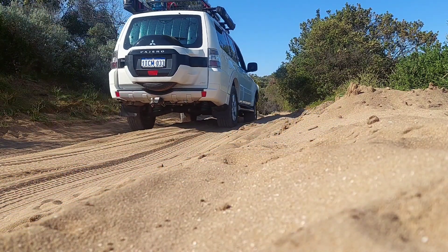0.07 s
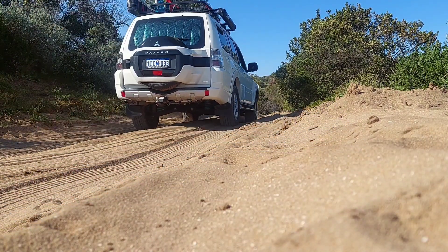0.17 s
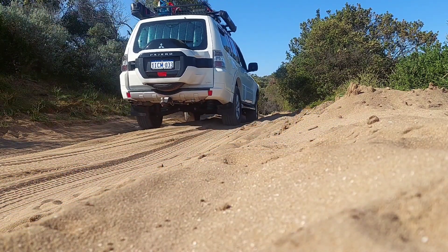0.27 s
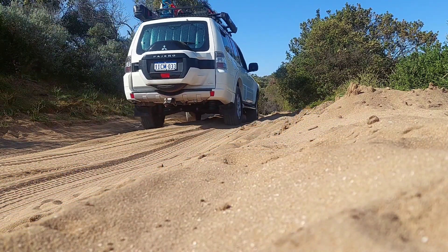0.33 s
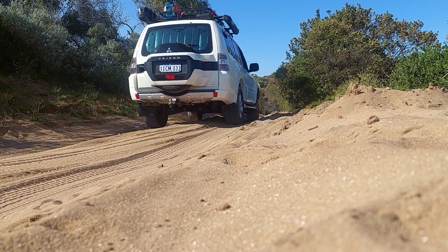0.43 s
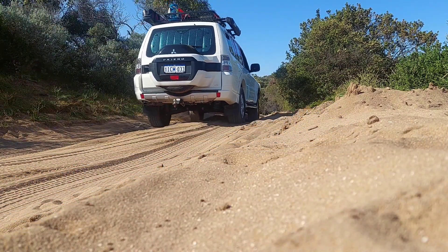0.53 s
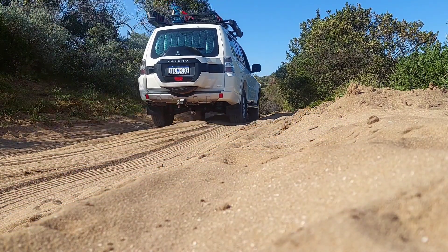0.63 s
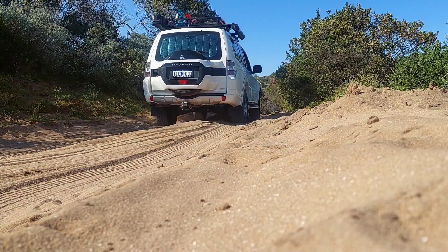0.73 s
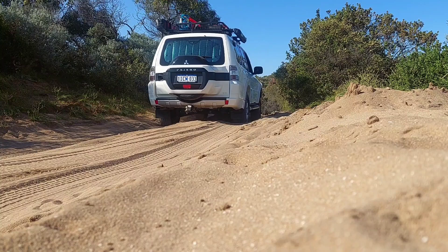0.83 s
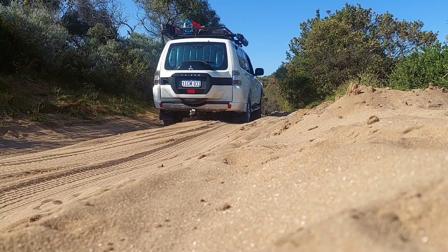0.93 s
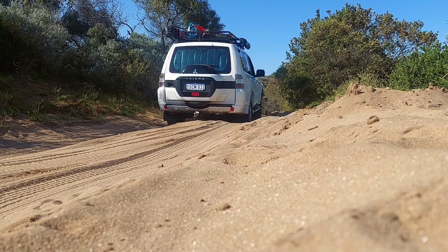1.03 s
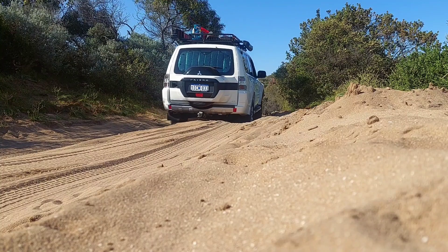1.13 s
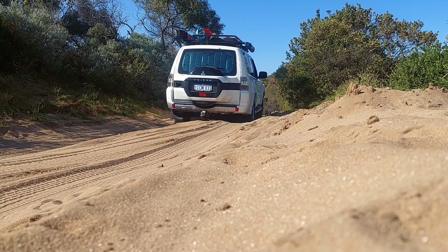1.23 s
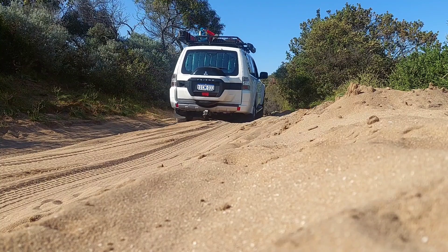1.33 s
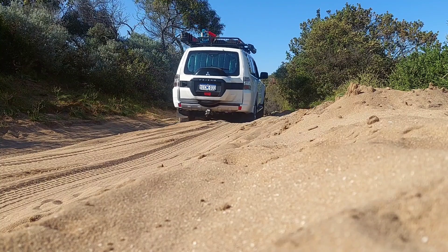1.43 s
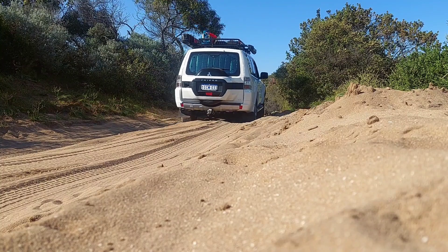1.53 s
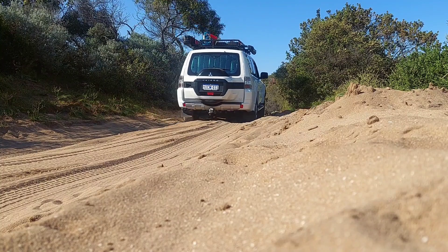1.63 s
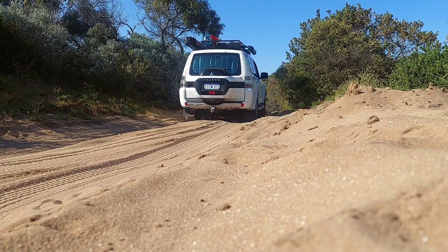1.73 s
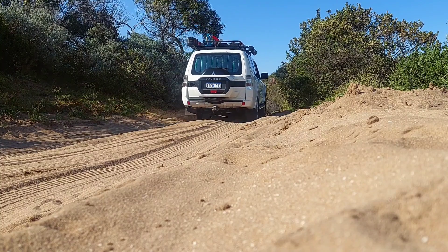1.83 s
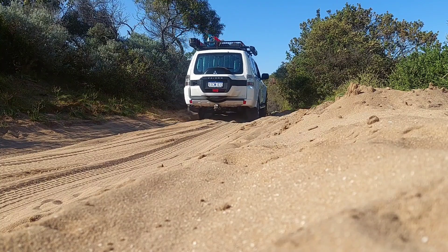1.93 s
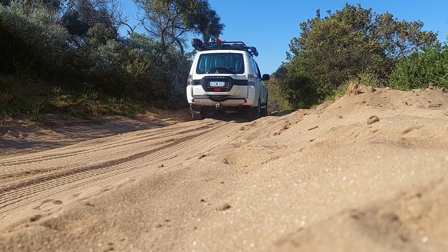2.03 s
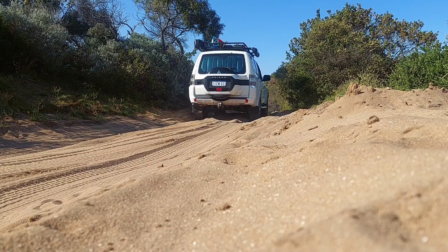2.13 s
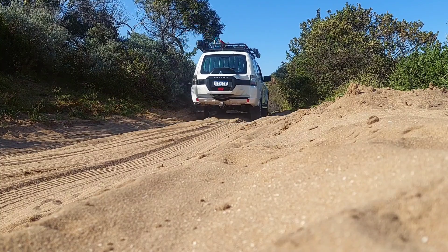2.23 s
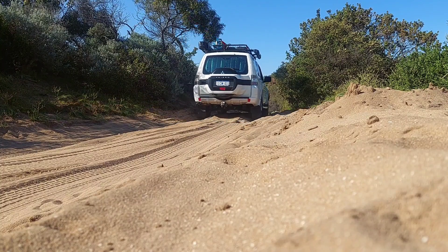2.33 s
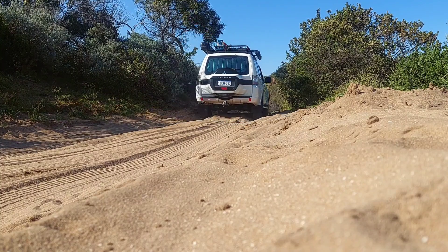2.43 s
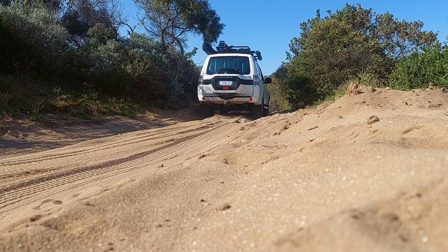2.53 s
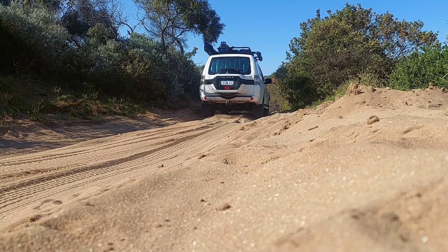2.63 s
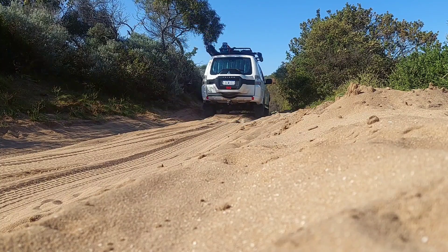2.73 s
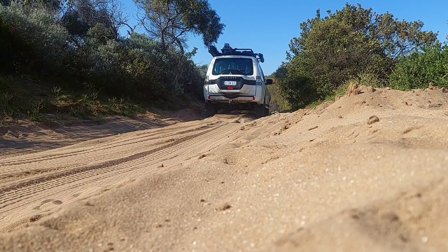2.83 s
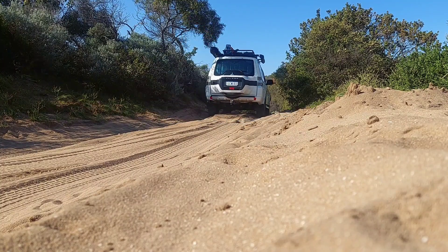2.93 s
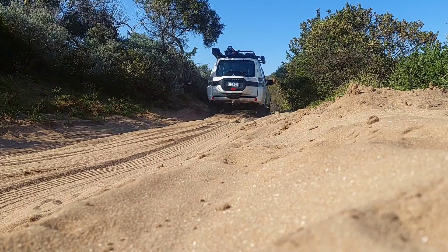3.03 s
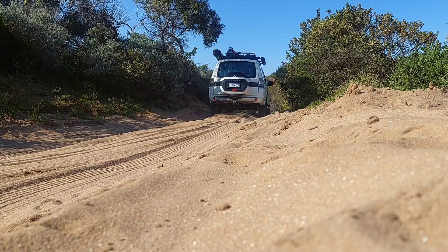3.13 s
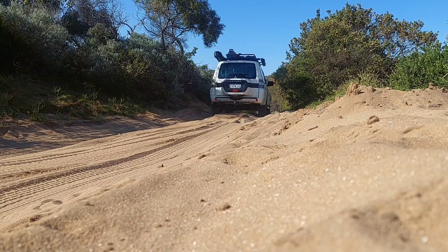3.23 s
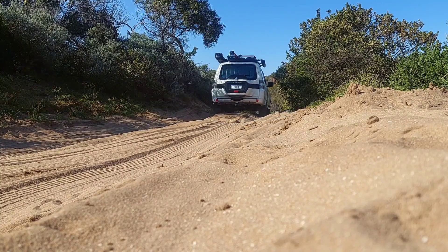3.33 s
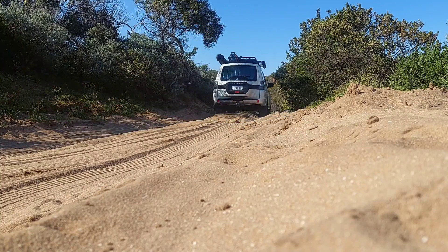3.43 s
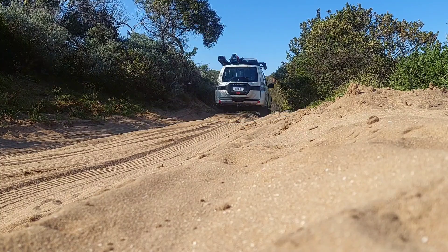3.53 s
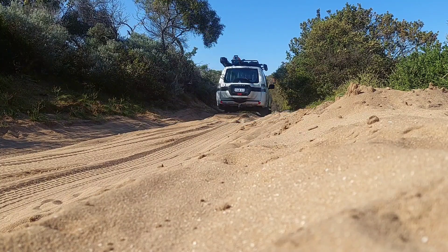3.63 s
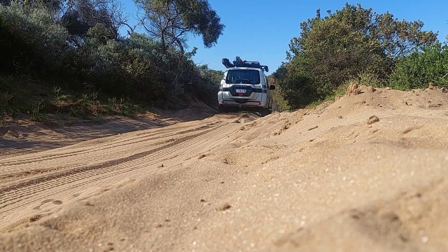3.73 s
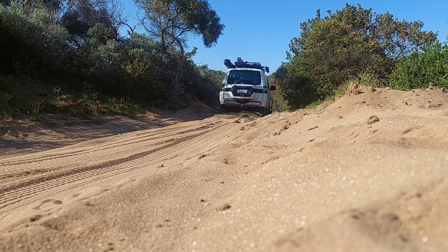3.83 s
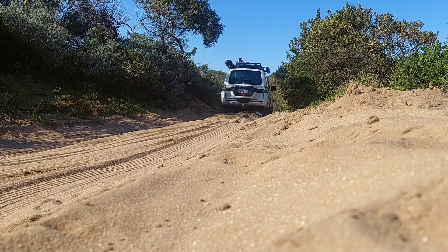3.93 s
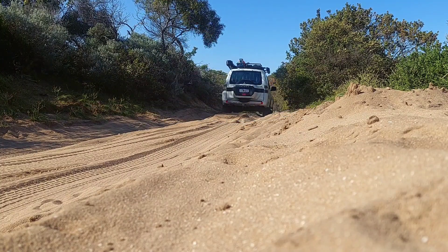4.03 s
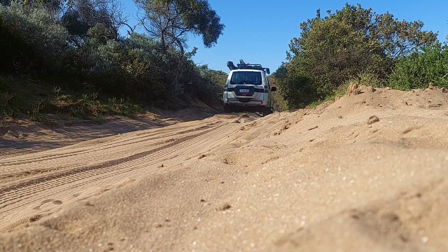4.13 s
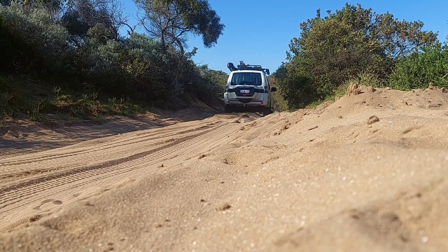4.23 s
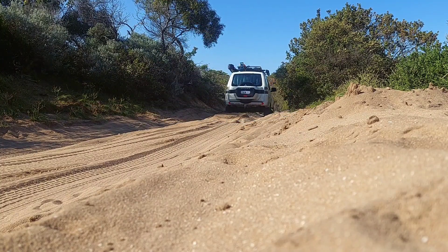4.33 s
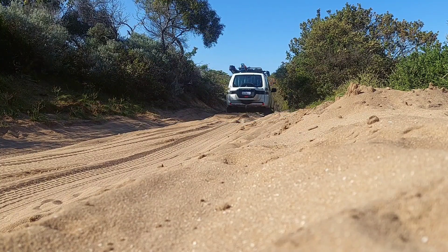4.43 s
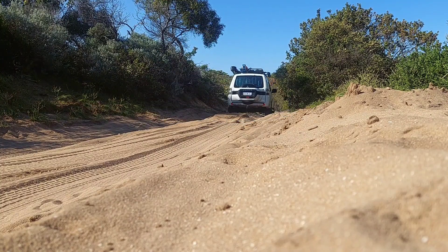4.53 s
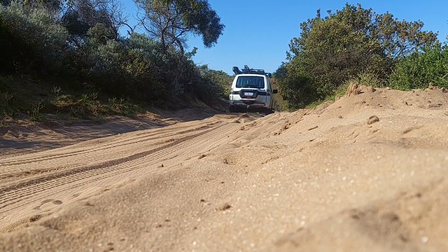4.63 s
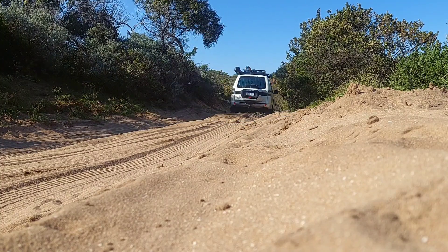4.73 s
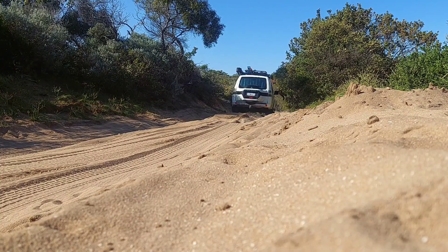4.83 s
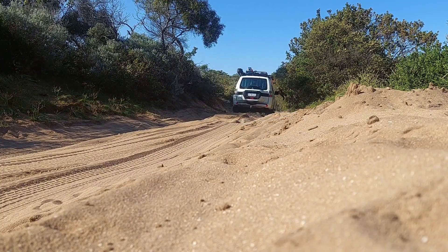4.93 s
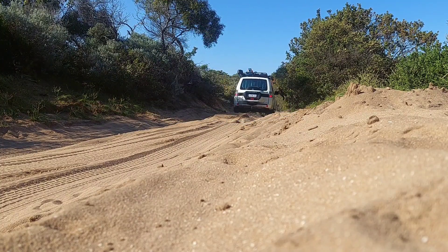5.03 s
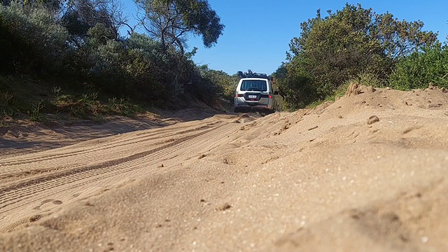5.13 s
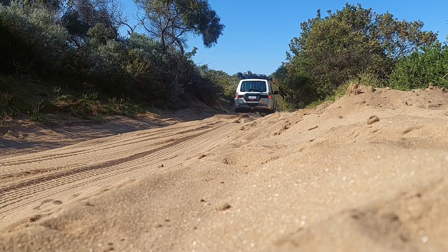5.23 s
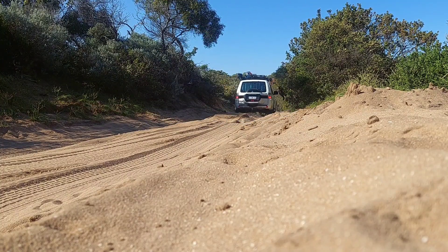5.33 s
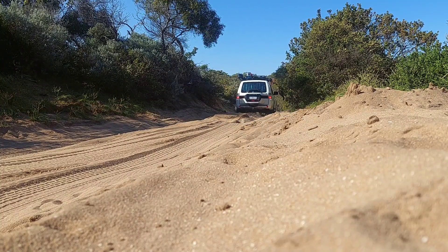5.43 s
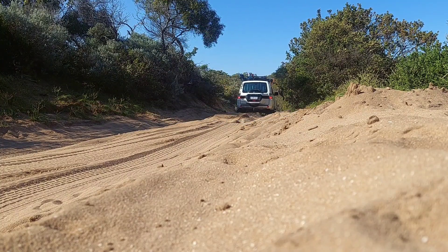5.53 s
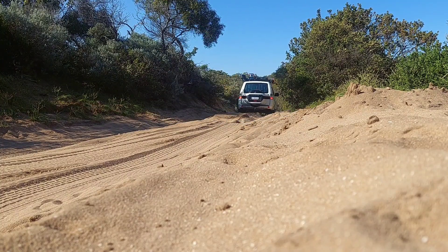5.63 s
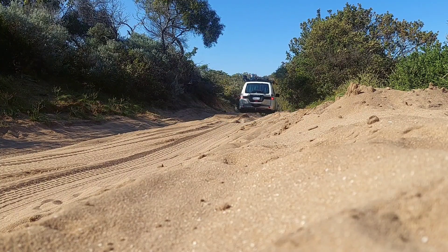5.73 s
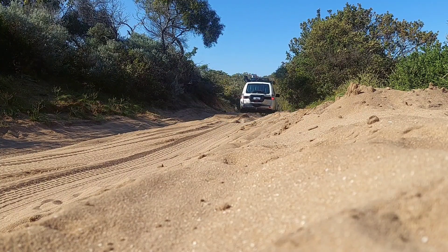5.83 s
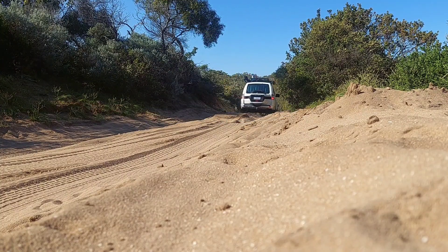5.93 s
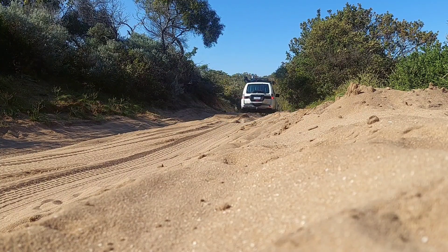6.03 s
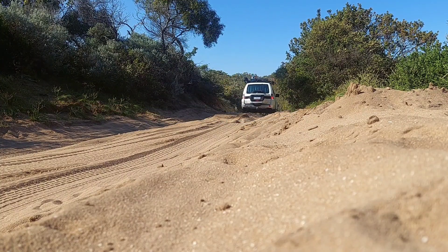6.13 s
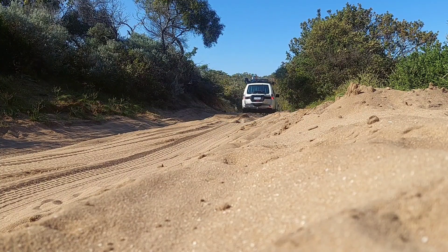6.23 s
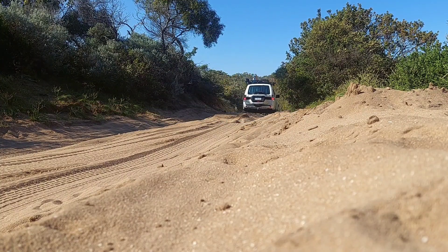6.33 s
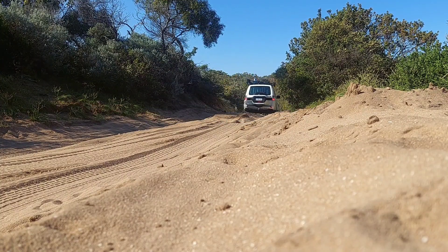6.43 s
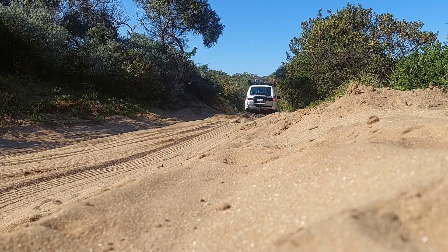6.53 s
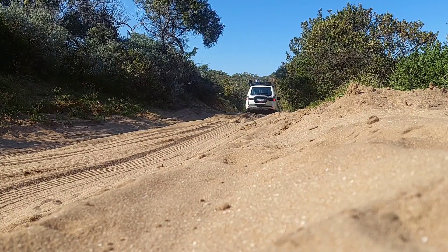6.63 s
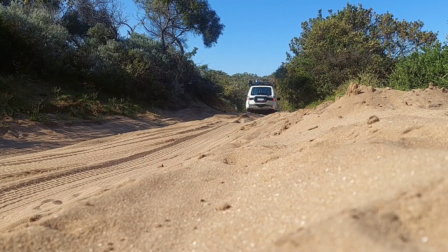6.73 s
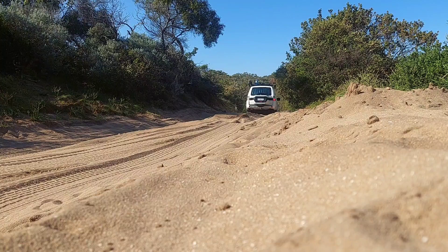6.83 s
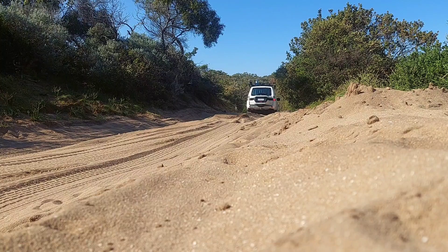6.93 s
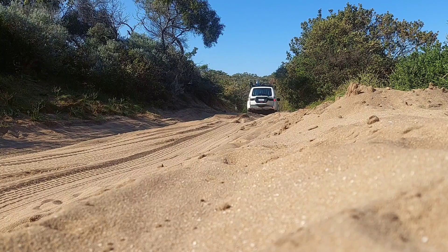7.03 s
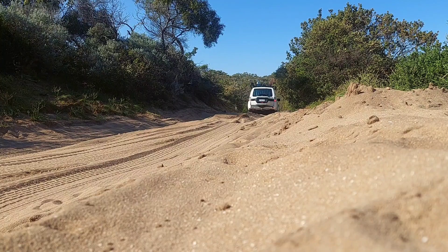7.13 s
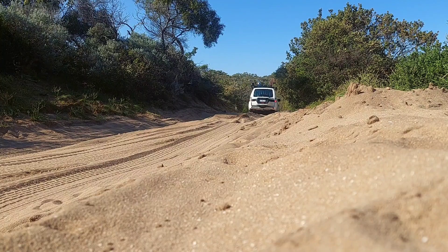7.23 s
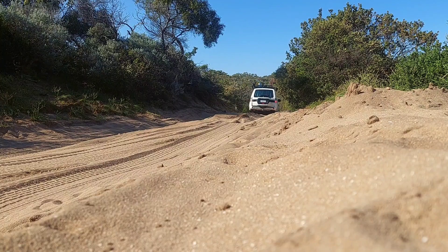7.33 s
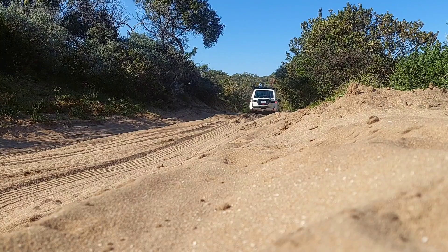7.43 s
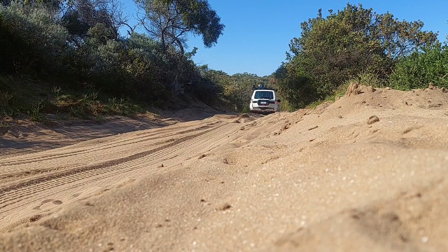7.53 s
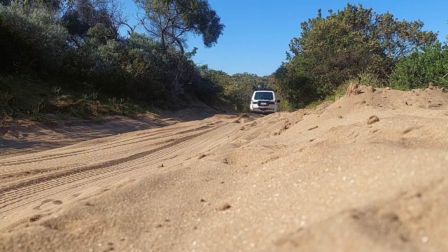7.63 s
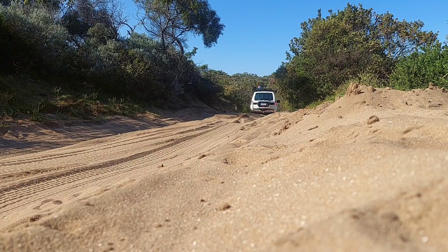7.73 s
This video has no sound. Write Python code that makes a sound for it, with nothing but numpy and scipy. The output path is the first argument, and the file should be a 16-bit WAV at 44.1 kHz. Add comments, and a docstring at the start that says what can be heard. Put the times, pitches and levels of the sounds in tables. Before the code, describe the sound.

A low exhaust note starts gently, pushes hard within the first second and drones away with soft sand hiss and a few dull tyre scuffs. After nearly four seconds the throttle drops and pitch sags, leaving distant, pulsing rumble. Sharp two-part bird notes come forward on the right, then thin ticks and whistles, and finally a faint, even run of chirps on the left. Low wind puffs bump the fixed outdoor stereo microphone.

```python
"""Sandy track through scrub, a stereo microphone 5 m behind a four-wheel drive as it pulls away.
It climbs under throttle, lifts off near 3.8 s and rumbles on behind a rise: the exhaust is clear crank
orders over a drone coloured by the pipe, the gas and tyres are shaped noise. Small birds, arcs of whistle
with scattered echoes, chirp on both sides; a few puffs of breeze thump the right microphone in slow, rough cycles."""
import sys
import numpy as np
from scipy import signal
from scipy.fft import rfft, irfft, next_fast_len
from scipy.io import wavfile

SR = 44100
rng = np.random.default_rng(int(sys.argv[2]) if len(sys.argv) > 2 else 0)


def log_audio(samples):
    """Write samples as a 16-bit WAV file to the path given in sys.argv[1]."""
    # one column per channel
    frames = np.atleast_2d(samples).T
    # limit to full scale, then quantise
    limited = np.clip(frames, -1, 1)
    pcm = np.round(limited * 32767).astype(np.int16)
    wavfile.write(sys.argv[1], SR, pcm)


N = 342657
TIME = np.arange(N) / SR


def amp(db):
    """Decibels to gain."""
    return 10 ** (np.asarray(db) / 20)


def unit(x):
    """Scales to rms 1."""
    return x / np.sqrt(np.mean(x ** 2) + 1e-20)


def curves(rows):
    """The columns of a time table, at every sample."""
    s, *columns = np.transpose(rows)
    return [np.interp(TIME, s, column) for column in columns]


def read(points, hz):
    """A spectrum table on a log-frequency axis."""
    f, value = np.transpose(points)
    return np.interp(np.log(hz + 1), np.log(f + 1), value)


def add(mix, s, sound):
    """Lays a stereo sound into the mix at time s."""
    part = mix[:, max(round(s * SR), 0):][:, :sound.shape[1]]
    part += sound[:, :part.shape[1]]


def pan(db):
    """Left and right gains for a level difference; positive is louder on the left."""
    return amp([[db / 2], [-db / 2]])


def swells(rows):
    """A sum of smooth bell-shaped bumps, one for each (s, half length s, height)."""
    return sum(height * np.exp(-.5 * ((TIME - s) / length) ** 2) for s, length, height in rows)


def noise(colour, same):
    """Stereo noise of a given colour at rms 1; same is the share of power common to both sides."""
    size, same = next_fast_len(N), np.clip(same, 0, 1)
    gain = amp(read(colour, np.fft.rfftfreq(size, 1 / SR)))
    spectra = rfft(rng.standard_normal((3, size))) * gain
    common, *own = irfft(spectra, size)[:, :N]
    return unit(np.sqrt(same) * common + np.sqrt(1 - same) * np.array(own))


def wander(hz):
    """A smooth random drift of rms 1, up to about hz."""
    f = np.fft.rfftfreq(4096, 1 / 400)  # drawn at 400 points a second
    drift = irfft(rfft(rng.standard_normal(2 * len(f) - 2)) / (1 + (f / hz) ** 4))
    return unit(np.interp(TIME, np.arange(len(drift)) / (2 * f[-1]), drift))


# colour of the faint background hiss: freq_hz, relative level_db (per Hz)
AIR_COLOUR = [(400, 1), (630, -4.5), (790, -5.5), (1000, -8), (2000, -10.5), (4000, -14.5), (6300, -19),
              (8500, -17), (9700, -13.5), (11000, -17.5), (13500, -16), (15400, -16)]


def air(level_db=-76.5):
    """A faint steady hiss, nearly independent at the two microphones."""
    return amp(level_db) * noise(AIR_COLOUR, 0.0095) * pan(-0.6)


# puffs of breeze on the microphone: start_s (centre), level_db (before the low cut), half_length_s
BREEZE_PUFFS = [(4.521, -40.5, 0.012), (4.577, -31.5, 0.0089), (4.873, -42, 0.023), (4.896, -30.5, 0.013),
                (5.008, -24.5, 0.0047), (5.044, -46.5, 0.038), (5.14, -47, .014), (5.181, -35, 0.014),
                (5.675, -45, 0.012), (5.881, -37.5, 0.0098), (5.929, -42, 0.016)]


def breeze(eddy_hz=72, unsteady=0.233, left_db=-24, churn=0.59, low_cut_hz=48):
    """Each puff shakes the right microphone port for a few slow cycles, with finer turbulence on top."""
    push = swells((s, length, amp(db)) for s, db, length in BREEZE_PUFFS)
    eddy_speed = eddy_hz * (1 + unsteady * wander(59.7))
    eddies = np.cos(2 * np.pi * np.cumsum(eddy_speed) / SR)
    colour = [(20, 3), (50, -0.5), (120, -2.5), (200, -18.0), (400, -39.5), (1000, -61), (3000, -100)]
    turbulence = noise(colour, 0)
    thumps = push * (0.92 * eddies + churn * turbulence) * amp([[left_db], [0]])
    low_cut = signal.butter(2, low_cut_hz, "highpass", fs=SR, output="sos")
    return signal.sosfilt(low_cut, thumps)


def scrub(x, t60=0.34, near_t60=0.034, near_db=6):
    """Nearby branches scatter a quick burst of echoes, the wider scrub a soft tail, different on each side."""
    t = np.arange(SR) / SR
    decay = amp(-60 * t / t60) + amp(near_db - 60 * t / near_t60)
    tail = rng.standard_normal((2, SR)) * decay
    return signal.fftconvolve(x, tail / np.linalg.norm(tail[0]), axes=1)[:, :N]


def syllable(length, pitches, swell_db, overtone_db, waver=0.011, flutter_db=5.0, taper=0.39):
    """A whistle that arcs through three pitches, never twice quite the same."""
    u = np.linspace(-1, 1, round(length * SR))
    strays = rng.standard_normal(size=(2, 8))
    bend, flutter = (np.interp(u, np.linspace(-1, 1, len(row)), row) for row in strays)
    period = np.polyval(np.polyfit([-1, 0, 1], 1 / pitches, 2), u)  # the arc is a parabola in period
    phase = 2 * np.pi * np.cumsum((1 + waver * bend) / period) / SR
    wave = np.sin(phase) + amp(overtone_db) * np.sin(2 * phase)
    level = amp(swell_db * u / 2 + flutter_db * flutter)
    return wave * level * signal.windows.tukey(len(u), taper)


# a far bird repeats its "weet" at an even pace towards the end
TRILL_S, TRILL_GAP_S, TRILL_DB, TRILL_PITCH = 7.085, 0.11, -77, 0.98


def trill(side_db=5, echo_db=1, count=9):
    """The far bird's even run as chirp rows, each straying a little in pitch."""
    return [("weet", TRILL_S + k * TRILL_GAP_S, TRILL_DB, side_db, TRILL_PITCH * (1 + 0.042 * stray), echo_db)
            for k, stray in enumerate(rng.standard_normal(count))]


# syllables of each bird note: start_s (from the note's accent), length_s, first_hz, middle_hz, last_hz
# (before the chirp's pitch factor), level_db (relative to the chirp), swell_db (from start to end)
BIRD_NOTES = { "chewit": [(-.042, .043, 4000, 2480, 4300, -8, 12), (-.002, .021, 4500, 3000, 2720, 0, 4)],
              "chew": [(-.042, .041, 3500, 2500, 3600, -3.5, 10), (-.002, .015, 3750, 3000, 2500, -3, 0)],
              "tsip": [(-.008, .008, 5400, 6200, 7300, -14, 3), (-.001, .017, 7500, 5850, 6200, -2, 2)],
              "seesik": [(-.039, .027, 6600, 5750, 5950, -7, 0), (-.011, .009, 4700, 5300, 5000, -7, 0),
              (-.001, .014, 7700, 6350, 5950, 0, 0), (.016, .014, 5250, 4500, 3700, -3, 0)],
              "tseesik": [(-.043, .031, 6050, 6680, 6200, -4, 3), (-.011, .01, 5900, 5850, 6100, -3, -4),
              (-.002, .013, 7600, 6450, 6150, 0, 0), (.013, .015, 5400, 4250, 3400, -2, -3)],
              "twik": [(-.021, .022, 2550, 3100, 4300, -6, 5), (-.001, .009, 4650, 3900, 3600, -7, 0),
              (.006, .026, 3620, 3540, 3560, -3, -4)], "weet": [(-.026, .052, 2620, 3050, 3130, -5, -2)],
              "mew": [(-.015, .029, 2820, 2690, 2870, -4, 2)],
              "tick": [(-.008, .019, 4150, 3350, 2200, -3, -5)],
              "whip": [(-.052, .042, 2850, 2570, 2860, -5, 4), (-.012, .018, 3050, 4150, 5200, -6, 9),
              (.01, .025, 5000, 3350, 3150, -18, 3)]}
# chirps of each note: accent_s, level_db, side_db (left over right), pitch_factor, echo_db (relative)
BIRD_CHIRPS = { "chewit": [(3.872, -59.5, -5.5, 0.98, -10.5), (4.324, -55.5, -5, 0.99, -12),
               (4.534, -51.5, -3.5, 1, -7.5), (4.755, -51.5, -6.5, 0.98, -12)],
               "chew": [(4.115, -61.5, -6, .97, -11), (5.047, -58, -5, 0.96, -5.5),
               (5.319, -62, -5, 0.97, -6)], "tsip": [(4.321, -72, 3.5, .99, 0),
               (4.671, -65.5, 5, 0.99, -0.5), (4.983, -52, 2, 1.05, -6), (5.264, -55.5, 3, 1.01, -9),
               (5.528, -56, -0.5, 1.063, -6.5), (6.683, -74.5, 3.5, 0.98, -3),
               (6.978, -71.5, 13.5, .95, -4.5), (7.245, -81, 4, .98, 5), (7.497, -62.5, 4.5, .96, 0),
               (7.528, -74, 8, 0.88, -10), (7.694, -74.5, 8, 0.95, -2)],
               "seesik": [(.456, -57, 7.5, 0.97, -7), (1.778, -68, 8, 1, -4), (2.172, -70, 2.5, 0.9, -1.5),
               (2.715, -72.5, 2, .99, 0.5), (3.171, -75, 3.5, 0.92, -6)],
               "tseesik": [(6.075, -58.5, -0.5, 0.96, -0.5)], "twik": [(.853, -67.5, 9, .99, 1.5),
               (.983, -66, 10.5, 1, 0), (1.084, -56.5, 5, 0.98, -5), (1.211, -65.5, 16, 0.95, 6.5),
               (5.475, -71.5, 1, 0.96, 11), (5.603, -61.5, 2, 1, -6), (5.73, -63.5, 1, 1, -4),
               (6.548, -72.5, 1, 0.96, -3)], "weet": [(.16, -67.5, 7, 1.42, 5.5),
               (1.29, -69, 2, 0.84, -2.5), (2.567, -70, -6.5, 1, -3), (2.737, -67.5, -4.5, 1.025, -1.5),
               (2.932, -68, -3.5, 1, -3), (3.29, -83, 6, 1.07, -5), (3.47, -78, 3, 1.08, -2),
               (5.41, -71, 2, 1.14, -9), (5.895, -77, 0, .88, -2), (5.948, -64.5, 2, 0.98, -4),
               (6.182, -71, -2, .89, -6), (6.233, -68, 3, 0.93, -12), (6.328, -83, 1, .98, -6),
               (6.495, -80, 1, 0.79, -5), (6.548, -71, 3.5, 0.96, -8)],
               "mew": [(.058, -71.5, -5.5, 0.94, -4), (4.652, -79, 4, .95, 5), (4.963, -76.5, -8, 0.93, 6),
               (5.245, -72, 5, 0.92, 4.5), (5.508, -72.5, 4, 0.91, 6.5)],
               "tick": [(.075, -76.5, 5, 1.7, 11), (.117, -79, 9, 1.6, 13), (.957, -64, 3, 1.02, -3),
               (2.39, -80.5, 5, 1, 5), (6.436, -76.5, 1, 1.045, 0), (6.65, -71, -1, .8, 3),
               (7.468, -82.5, -1, .9, 15)], "whip": [(6.793, -51.5, 0, 0.99, 2)]}
OVERTONE_DB, MEW_OVERTONE_DB = -30.5, 1  # the mew is nasal, the other notes are nearly pure
PORT_DELAY = .7  # samples between the microphone ports, for each dB of side_db


def birds():
    """Each chirp arrives directly, earlier on its louder side, and again from the scrub."""
    direct, scattered = np.zeros((2, N)), np.zeros((2, N))
    chirps = [(note, *row) for note, rows in BIRD_CHIRPS.items() for row in rows] + trill()
    for note, s, db, side_db, pitch, echo_db in chirps:
        overtone_db = MEW_OVERTONE_DB if note == "mew" else OVERTONE_DB
        for offset, length, *pitches, level_db, swell_db in BIRD_NOTES[note]:
            whistle = syllable(length, pitch * np.array(pitches), swell_db, overtone_db)
            sound = amp(db + level_db) * whistle
            right = np.roll(sound, round(PORT_DELAY * side_db))
            add(direct, s + offset, np.array([sound, right]) * pan(side_db))
            add(scattered, s + offset, amp(echo_db) * sound * pan(side_db / 2))
    return direct + scrub(scattered)


# the driver's foot, a nudge, a long pull, a last push, then off: time_s, throttle (0-1)
DRIVER_THROTTLE = [(0, 0), (.3, 0.38), (.66, 0.18), (.86, 0.97), (1.28, 1), (1.5, 0.88), (1.7, 1),
                   (2.8, 0.97), (3.22, 0.5), (3.48, 0.73), (3.76, 0.76), (3.88, 0.18), (7.77, 0)]
START_M, AWAY_M_PER_S = 5.27, 2.7  # the vehicle recedes at a steady pace
CREST_S, CREST_WIDTH_S = 4.07, 0.41  # and sinks behind a rise in the track


def heard(idle_db, throttle_db, hidden_db, falloff=1):
    """Level in dB of a vehicle part: set by throttle and distance, less hidden_db behind the crest."""
    spreading_db = 20 * np.log10(1 + AWAY_M_PER_S * TIME / START_M)
    hidden = .5 + .5 * np.tanh((TIME - CREST_S) / CREST_WIDTH_S)
    return idle_db + throttle_db * curves(DRIVER_THROTTLE)[0] - falloff * spreading_db - hidden_db * hidden


# colour of the sand hiss: freq_hz, relative level_db (per Hz)
SAND_COLOUR = [(300, -30.5), (650, 0.5), (880, 9), (1150, 5.5), (1600, 8), (2500, 1.5), (5000, -5.5),
               (8000, -4), (10500, -1.5), (13000, -4.5), (15500, -11.5)]
# sprays of sand from the tyres: centre_s, half_length_s, added level_db
SAND_SPRAYS = [(.39, 0.12, 3), (.79, .05, 4), (1.12, .09, 5)]
# scuffs of a slipping tyre: centre_s, half_length_s, level_db (before pan and grain)
TYRE_SCUFFS = [(0.421, 0.12, -75), (0.818, 0.11, -69.5), (1.066, .04, -70), (1.773, 0.029, -74)]
# colour of the scuffs: freq_hz, relative level_db (per Hz)
SCUFF_COLOUR = [(400, -16), (850, 9), (1250, -4.5), (1700, -9), (3000, -32), (8000, -48)]


def tyres(patchy_db=0.6, grain_db=1.5):
    """Sand sprays from the treads in an uneven, grainy hiss, with a duller scuff when a tyre slips."""
    level = heard(idle_db=-77.5, throttle_db=3.0, hidden_db=10, falloff=0.96) + swells(SAND_SPRAYS)
    hiss = noise(SAND_COLOUR, 0.037) * amp(level + patchy_db * wander(14.0)) * pan(-1.9)
    slip = swells((s, length, amp(db)) for s, length, db in TYRE_SCUFFS)
    scuffs = noise(SCUFF_COLOUR, 0.7) * slip * pan(-6)
    return (hiss + scuffs) * amp(grain_db * wander(150))


# crank speed under power: time_s, speed (turns a second)
CRANK_PULLING = [(0.0, 23.0), (0.21, 27.5), (0.66, 27.4), (0.9, 29.7), (1.16, 30.2), (1.51, 29.8),
                 (1.78, 31.2), (2.7, 30.5), (3.06, 32.4), (3.71, 34.7), (3.81, 33.2), (3.9, 30.4)]
# crank speed rolling on: time_s, speed (turns a second)
CRANK_ROLLING = [(4.05, 25.6), (4.26, 22.9), (4.58, 26.1), (5.69, 19.7), (7.06, 19.3), (7.45, 20.6),
                 (7.77, 26.3)]
HUNTING = .0015  # rms share by which the speed wanders


def crank_speed():
    """The engine's turns a second, hunting slightly about its course."""
    return curves([*CRANK_PULLING, *CRANK_ROLLING])[0] * (1 + HUNTING * wander(12.5))


# swells of the exhaust boom, under power or on the overrun: centre_s, half_length_s, boom_db,
# flare_db (of the gas, negative for a dip)
BOOM_SWELLS = [(0.123, 0.12, 7.5, 5.5), (0.896, 0.14, 4.5, 6), (1.25, 0.031, 4.5, -2.5),
               (1.747, .1, 3.5, 3.5), (2.952, 0.23, 4.5, 2.5), (3.49, 0.076, 4.5, -1),
               (3.745, 0.13, 2.5, 0.5), (4.302, 0.056, 5, 5), (4.573, 0.15, 8.5, 2), (5.114, 0.14, 8.5, 9),
               (5.475, .1, 8, 2), (5.9, 0.066, 5, 3.5), (6.304, 0.12, 2.5, 0.5), (7.45, 0.14, 10.5, 1)]


def exhaust_boom():
    """Decibels of boom as the exhaust swells, under power or on the overrun."""
    return swells((s, length, db) for s, length, db, _ in BOOM_SWELLS)


# colour of the exhaust gas: freq_hz, relative level_db (per Hz)
GAS_COLOUR = [(100, -6.5), (165, 9), (220, 6), (310, 2), (450, -4.5), (560, -10.5), (700, -18.5),
              (1000, -34), (1600, -42), (3500, -58), (9000, -83.5)]
# colour of the loose rumble: freq_hz, relative level_db (per Hz)
RUMBLE_COLOUR = [(10, -32), (28, -22), (42, -6), (70, 0), (135, -1), (185, -12), (270, -16), (400, -36),
                 (800, -65), (3000, -100)]


def roar(turns, boom, flare_lead_s=0.051, rumble_share=.4):
    """Gas pulses with the puffs and flares or dips ahead of each boom, over a rumble of body and wheels."""
    flare = swells((s - flare_lead_s, length, db) for s, length, _, db in BOOM_SWELLS)
    gas_level = heard(idle_db=-51.5, throttle_db=5.5, hidden_db=15.5, falloff=1.064) + flare
    rumble_level = heard(idle_db=-46.5, throttle_db=5.0, hidden_db=3.5, falloff=0.76) + rumble_share * boom
    gate = unit(1 + .2 * np.cos(2 * np.pi * (turns - .2)))  # one swell a crank turn
    gas = noise(GAS_COLOUR, 0.86) * gate * amp(gas_level) * pan(-4.5)
    rumble = noise(RUMBLE_COLOUR, 0.86) * amp(rumble_level) * pan(-0.64)
    return gas + rumble


# resonances of the exhaust pipe: freq_hz, relative level_db
EXHAUST_PIPE = [(15, -30.5), (31, -20), (120, -2), (153, -0.5), (183, -21), (200, 3.5), (214, 2), (243, -9),
                (275, -2.5), (305, -12.5), (335, -17), (375, -34), (450, -17.5), (620, -39.5),
                (1000, -49.5)]
# clear exhaust orders, keyed by multiple of the crank speed: idle level_db, db added by full throttle,
# db lost behind the crest (negative for a gain), share of the boom
EXHAUST_ORDERS = {1: (-66, 8, 5.5, -0.6), 2: (-44, 3, 10, 0.12), 3: (-47, 6.5, 3, 1),
                  4: (-55, 19.5, -2.5, 0.28), 5: (-57, 12, -1, 0.06), 6: (-64.5, 9, 2.5, 0.97),
                  7: (-60, 18.5, 6.5, 0), 11: (-72.5, 12, 7, -0.5), 14: (-76, 13, 17, -1),
                  15: (-77, 12, 20, 1)}
WAVER_DB, ROUGH_DB, PHASE_DRIFT = .7, 1.8, .2  # rms wander of clear orders, of the drone, of phase in radians


def exhaust(speed, turns, boom, drone_idle_db=-58, drone_throttle_db=12, drone_hidden_db=5,
            half_order_db=-9, smear=0.1596):
    """A throb each crank turn: clear orders at their own levels, over a drone sliding through pipe resonances."""
    hz = np.arange(SR // 2 + 1)
    log_gain = np.log(amp(read(EXHAUST_PIPE, hz)))
    # the pipe rings after each puff: its phase lag follows from its gain
    lag = signal.hilbert(np.r_[log_gain, log_gain[-2:0:-1]]).imag[:len(hz)]
    clear_db = {k: heard(idle, push, hidden) + share * boom
                for k, (idle, push, hidden, share) in EXHAUST_ORDERS.items()}
    clear, drone = np.zeros(N), np.zeros(N)
    for k in np.arange(1, 22, .5):
        # the silencer smears each puff; the orders drift slowly against each other, so the throb is uneven
        pipe_lag = np.interp(k * speed, hz, lag)
        phase = 2 * np.pi * k * turns - pipe_lag - smear * k ** 2 + PHASE_DRIFT * wander(4)
        wave = np.sqrt(2) * np.cos(phase)
        if k in clear_db:
            clear += wave * amp(clear_db[k] + WAVER_DB * wander(2.5))
        else:  # the two turns of a cycle differ a little, which gives weak half orders
            weak_db = half_order_db * (k % 1 > 0)
            drone += wave * amp(read(EXHAUST_PIPE, k * speed) + ROUGH_DB * wander(8.4) + weak_db)
    drone_level = heard(drone_idle_db, drone_throttle_db, drone_hidden_db)
    return (clear + amp(drone_level) * unit(drone)) * pan(-2.5)


def scene():
    """The vehicle, the birds and the breeze over a faint steady hiss."""
    speed = crank_speed()
    turns = np.cumsum(speed) / SR
    boom = exhaust_boom()
    return air() + breeze() + birds() + tyres() + roar(turns, boom) + exhaust(speed, turns, boom)


EDGE_HZ = 15450


def record(dry):
    """The recorder's band limit: a steep treble cut at EDGE_HZ."""
    low_pass = signal.firwin(511, EDGE_HZ, window=("kaiser", 9), fs=SR)
    return signal.oaconvolve(dry, low_pass[None], "same")


dry = scene()
out = record(dry)
log_audio(out)
```